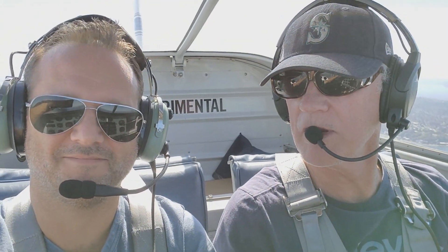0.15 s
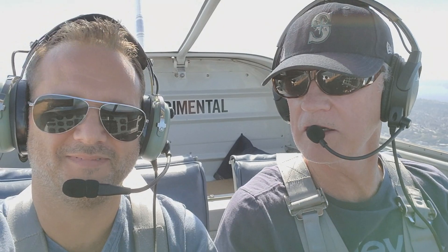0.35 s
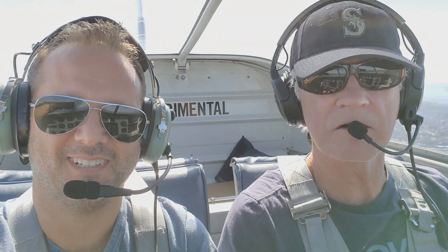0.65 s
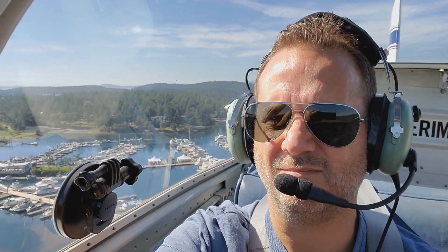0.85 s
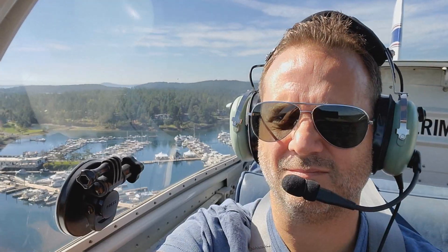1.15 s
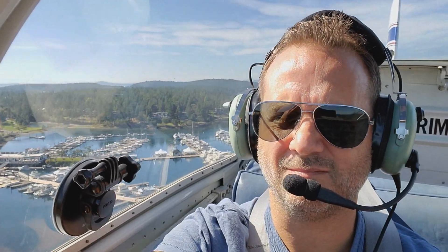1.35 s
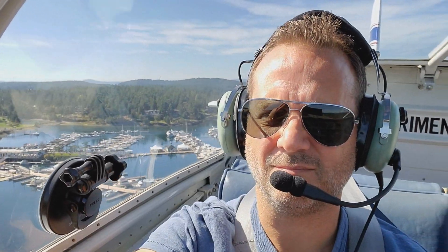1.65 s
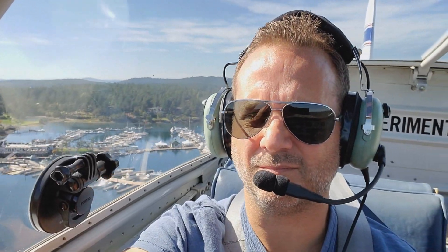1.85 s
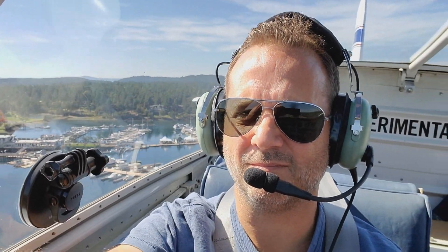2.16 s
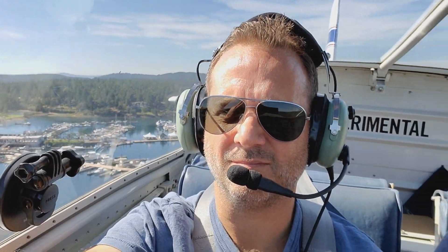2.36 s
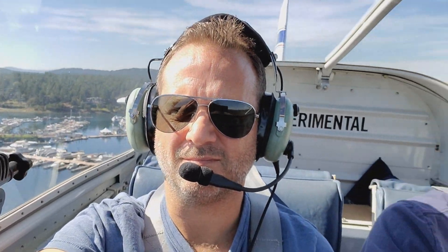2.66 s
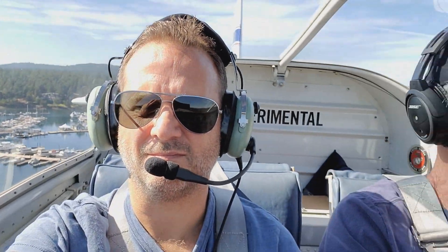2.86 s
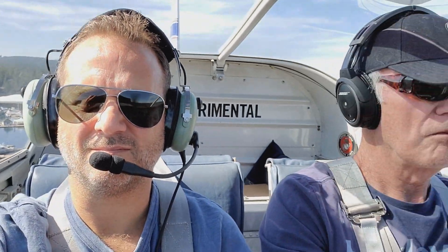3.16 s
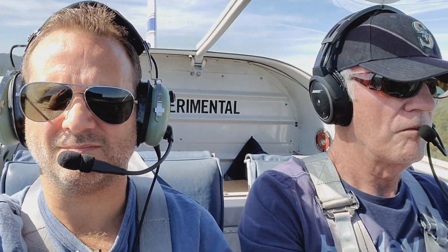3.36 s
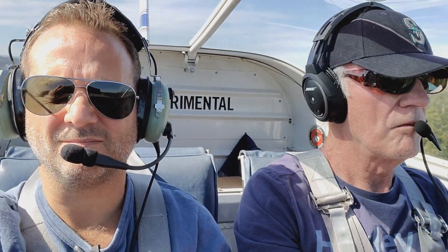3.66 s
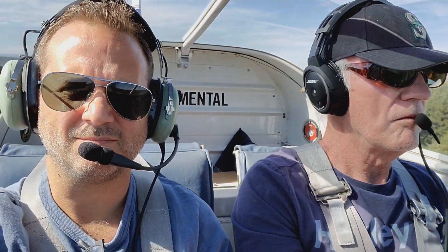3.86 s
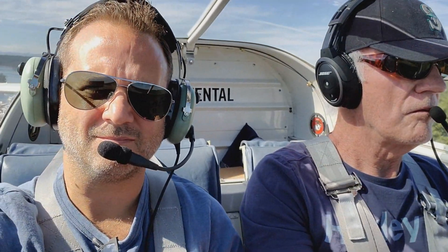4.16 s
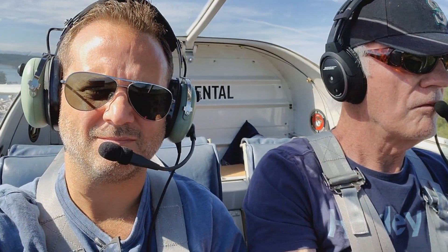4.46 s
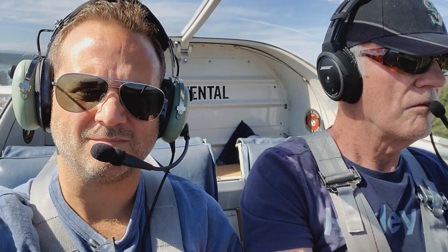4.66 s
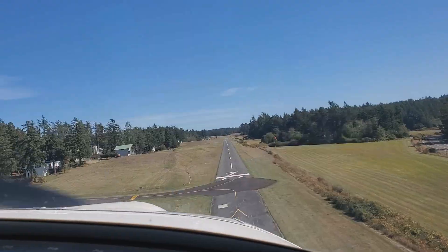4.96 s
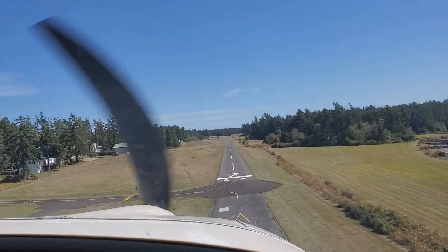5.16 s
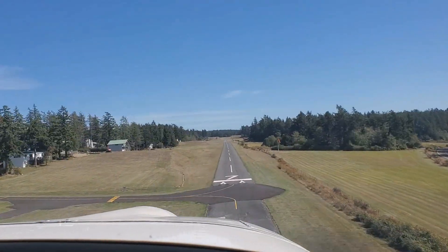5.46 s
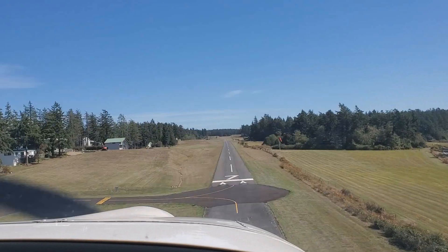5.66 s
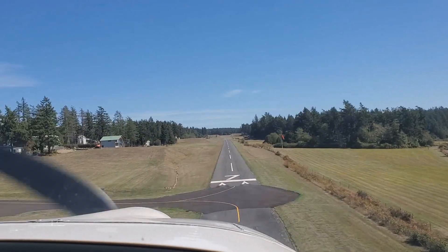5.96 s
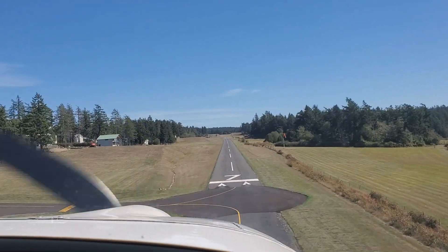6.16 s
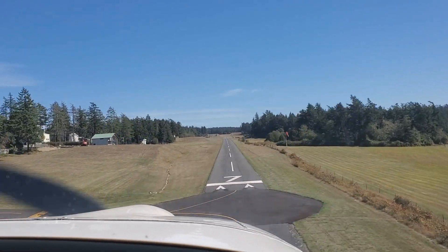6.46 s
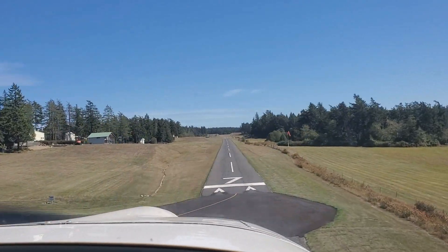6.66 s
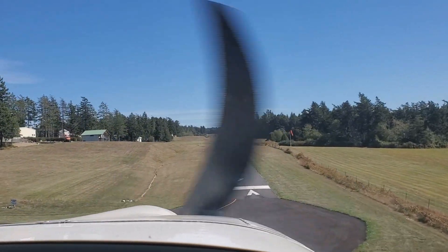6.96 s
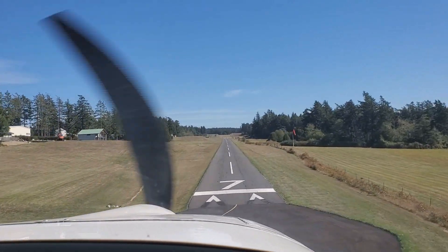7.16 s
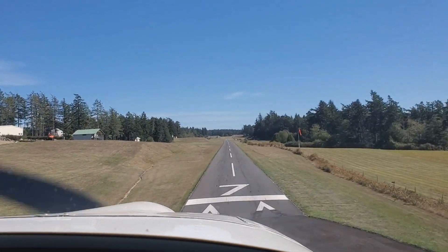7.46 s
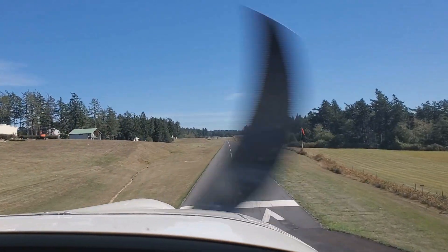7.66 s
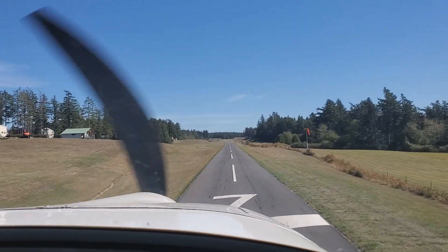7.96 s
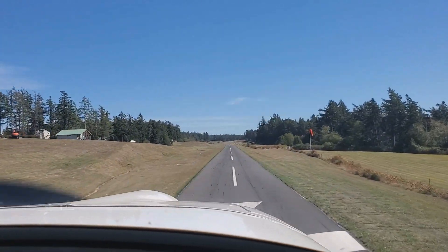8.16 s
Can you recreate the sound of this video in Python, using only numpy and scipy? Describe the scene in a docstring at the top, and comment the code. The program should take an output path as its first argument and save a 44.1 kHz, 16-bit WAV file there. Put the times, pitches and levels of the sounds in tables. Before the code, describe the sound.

A phone in a cramped light plane cabin picks up three abruptly joined stretches: fast cruise with a dense engine drone and strong wind; slower level flight with a deeper, smoother drone whose tone shifts gently as the phone swings; then an approach where the drone weakens, bassy buffets knock the airframe and a thin, rapid squeak chatters on top. No speech; wide, enclosed, boomy bass with dull-edged hiss.

```python
"""Inside the cabin of a light piston aircraft, a phone's two microphones hear three shots spliced together.
First fast cruise: the four-stroke engine drones and clatters on multiples of its cycle, over slipstream noise.
Then slower level flight, where the phone swings to mid-cabin and the drone's balance shifts with it.
Last the approach: a part squeaks once per crank turn, gusts thump the airframe and the drone falls back.
The phone's limiter ducks after the hardest thumps."""
import sys
import numpy as np
from scipy import signal
from scipy.fft import irfft
from scipy.io import wavfile
from scipy.ndimage import uniform_filter1d, minimum_filter1d

SR = 44100
rng = np.random.default_rng(int(sys.argv[2]) if len(sys.argv) > 2 else 0)


def dump(signal):
    """Clip the signal to [-1, 1] and save it as 16-bit WAV at the path in sys.argv[1]."""
    limited = np.clip(np.atleast_2d(signal).T, -1, 1)
    pcm = np.round(limited * 32767).astype(np.int16)
    wavfile.write(sys.argv[1], SR, pcm)


N = 366030
TIME = np.arange(N) / SR  # seconds
FREQ = np.maximum(np.fft.rfftfreq(N, 1 / SR), 1)  # Hz


def undb(db):
    """Decibels to gain."""
    return 10 ** (np.asarray(db) / 20)


def curve(rows):
    """Rows of time in seconds and value, joined by straight lines."""
    return np.interp(TIME, *np.transpose(rows))


def swing(rows):
    """A dB curve less the mean of its rows, so only its rises and falls count."""
    return curve(rows) - np.mean(np.array(rows)[:, 1])


def walk(rate):
    """Slow chance with a spread near 1: random points, rate per second, joined by straight lines."""
    knots = rng.standard_normal(1024)
    return np.interp(TIME * rate, np.arange(len(knots)), knots) * np.sqrt(3 / 2)


# Peaks and dips that the cabin and the microphone ports put on every broad spectrum.
# Each row: centre in Hz, width in Hz, left change in dB, right change in dB.
CABIN_PEAKS = [(203, 8.5, -3.5, 0), (230, 100, 3, 1), (397, 49, 0, -3.5), (442, 54, -12.5, 4.5),
               (558, 69, 2, -2), (625, 48, -3.5, 4.5), (1118, 130, 2, 4.5), (1299, 52, 7.5, 4.5),
               (1673, 55, 5.5, 1.5), (1820, 105, -3, 4), (2100, 250, 1.5, -1.5), (2320, 170, 2, 2),
               (3080, 2400, -2, 0), (4130, 550, 2.5, 1), (6600, 810, -5.5, 1), (7250, 1000, -3, 0.5),
               (8250, 1200, 0, -1), (11500, 1700, 0, 3), (13600, 2200, -1, 0.5)]


def colour(air, hz):
    """Relative left and right dB per Hz: a broad spectrum with the cabin's peaks and dips on it."""
    points, *sides = np.transpose(air)
    db = np.array([np.interp(np.log(hz), np.log(points), side) for side in sides])
    for centre, width, left, right in CABIN_PEAKS:
        bump = np.exp(-2 * ((hz - centre) / width) ** 2)
        db = db + np.outer([left, right], bump)
    return db


def likeness(hz, span_s=0.00048):
    """In the diffuse cabin both microphones hear the same bass but unrelated treble."""
    return np.sinc(2 * hz * span_s)


def stereo_spectrum(hz):
    """Random complex amplitudes of unit power for left and right, as alike as the cabin makes them."""
    mid, side = (rng.standard_normal((2, len(hz))) + 1j * rng.standard_normal((2, len(hz)))) / 2
    mid = mid * np.sqrt(1 + likeness(hz))
    side = side * np.sqrt(1 - likeness(hz))
    return np.array([mid + side, mid - side])


def cycles(rpm):
    """Count of four-stroke cycles: one for every two turns of the crank."""
    return np.cumsum(curve(rpm)) / (2 * 60 * SR)


def repeat(orders, amplitudes, cycle, size=8192):
    """Stereo lines of the given rms amplitudes, locked to the engine cycle."""
    spectrum = np.zeros((2, size // 2 + 1), complex)
    spectrum[:, orders] = amplitudes * size / np.sqrt(2)
    points = np.arange(size) / size
    return np.array([np.interp(cycle % 1, points, wave) for wave in irfft(spectrum)])


def drone(lines, air, cycle, cycle_hz, waver_db, smear, change, count=4):
    """Firing tone and the weaker lines of unequal cylinders; the firing multiples are the steadiest."""
    orders, *levels = np.transpose(lines)
    orders = np.round(orders).astype(int)
    hz = orders * cycle_hz
    # the cabin sets each line's left-right balance, not its power
    balance = undb(colour(air, hz))
    balance = balance / np.sqrt(np.mean(balance ** 2, axis=0))
    lead = np.arccos(likeness(hz)) * rng.choice([-1, 1], len(hz)) / 2
    # the lines arrive within a share (smear) of the cycle, so the drone throbs once per cycle
    delays = smear * rng.random(len(hz))
    phase = -2 * np.pi * np.cumsum(delays * np.diff(orders, prepend=0))
    tones = balance * np.exp(1j * (phase + np.array([lead, -lead])))
    out = 0
    for k in (1, 2, count):  # once-a-cycle, crank and firing multiples waver separately
        family = np.gcd(orders, count) == k
        before, after = (repeat(orders[family], (tones * undb(db))[:, family], cycle)
                         for db in (levels[0], levels[-1]))
        waver = waver_db * walk(11) * (.4 if k == count else 1)
        out = out + (before + change * (after - before)) * undb(waver)
    return out


def clatter(air, cycle, cycle_hz, onset_hz=700, fade_hz=2200, count=260):
    """Valve gear and exhaust rattle alike every cycle: a fine comb of lines in the middle range."""
    orders = np.arange(1, count)
    hz = orders * cycle_hz
    band = np.clip(2 * hz / onset_hz - 1, 0, 1) / (1 + (hz / fade_hz) ** 2)
    lines = stereo_spectrum(hz) * undb(colour(air, hz)) * band * np.sqrt(cycle_hz)
    return repeat(orders, lines, cycle)


def canopy(sound, share=0.24, lag_s=0.000324, sway=0.13):
    """A reflection off the canopy; its path changes as the phone moves, so the hiss changes colour."""
    lags = (lag_s * np.exp(sway * walk(0.793)) for _ in sound)
    echo = np.array([np.interp(TIME - lag, TIME, side) for lag, side in zip(lags, sound)])
    return (sound + share * echo) / np.hypot(1, share)


# Patches of rough air that swell the airframe rumble.
# Each row: middle in seconds, half length in seconds, rise in dB.
ROUGH_AIR = [(0.15, 0.3, 2.5), (2.55, 0.22, 3), (3.317, 0.077, 5), (3.95, 0.19, 2.5), (6.348, 0.43, 2),
             (8.0, 0.15, 3)]
RUMBLE_WANDER_DB, RUMBLE_WANDER_PER_S = 1.0, 4


def turbulence():
    """Rise of the rumble in dB: it wanders a little and swells in each patch of rough air."""
    swells = sum(db * np.exp(-((TIME - s) / length) ** 2) for s, length, db in ROUGH_AIR)
    return swells + RUMBLE_WANDER_DB * walk(RUMBLE_WANDER_PER_S)


def slipstream(air, cycle, rush, rumble_db, throb, split_hz=330, throb_top_hz=1600, flicker_db=0.4):
    """Airframe rumble, a roar that throbs with the engine, and smooth wind hiss on the canopy."""
    noise = stereo_spectrum(FREQ) * undb(colour(air, FREQ)) * np.sqrt(N * SR / 2)
    low, below_hiss = (1 / (1 + (FREQ / hz) ** 4) for hz in (split_hz, throb_top_hz))
    bands = (low, below_hiss - low, 1 - below_hiss)
    rumble, roar, hiss = (irfft(noise * band, N) for band in bands)
    # beats per engine cycle, each at its own chance phase
    beats = sum(np.cos(2 * np.pi * (k * cycle + rng.random())) for k in (1, 2, 3, 6, 7))
    wind = roar * (1 + throb * beats) + canopy(hiss)
    wind = wind * undb(swing(rush) + flicker_db * walk(14))
    return rumble * undb(rumble_db + turbulence()) + wind


def cabin(rpm, lines, air, rush, drone_db, waver_db, smear, clatter_db, air_db, rumble_db, throb, change=0):
    """Engine and air in one shot; change (0-1) moves the drone from its first balance to its second."""
    cycle = cycles(rpm)
    cycle_hz = np.mean(np.array(rpm)[:, 1]) / (2 * 60)
    cycle = cycle + 0.0017 * walk(9)  # the crank runs a little unevenly
    engine = undb(drone_db) * drone(lines, air, cycle, cycle_hz, waver_db, smear, change)
    engine = engine + undb(clatter_db) * clatter(air, cycle, cycle_hz)
    return engine + undb(air_db) * slipstream(air, cycle, rush, rumble_db, throb)


# Engine speed in fast cruise, nearly steady. Each row: time in seconds, speed in rpm.
CRUISE_RPM = [(0.0, 2535), (0.4, 2534), (0.8, 2529)]
# Drone lines in cruise; the fourth multiple is the firing rate.
# Each row: multiple of the four-stroke cycle rate, relative rms level in dB.
CRUISE_ORDERS = [(3, -42), (4, -16.5), (5, -35), (6, -39), (7, -32), (8, -21), (9, -38), (10, -24.5),
                 (11, -40), (12, -21.5), (13, -23.5), (14, -34.5), (15, -45), (16, -28), (17, -36.5),
                 (19, -49), (20, -37), (21, -40), (23, -35.5), (24, -40), (25, -36.5), (27, -46), (28, -43),
                 (29, -55)]
# Slipstream and engine noise at the two microphones in cruise.
# Each row: frequency in Hz, relative left level in dB per Hz, relative right level in dB per Hz.
CRUISE_AIR = [(30, -63, -59), (70, -48.5, -44), (112, -34.5, -40), (162, -51.5, -48.5), (290, -45, -42),
              (392, -57, -50.5), (654, -53.5, -52), (1100, -66, -61.5), (1470, -62, -54),
              (2250, -65.5, -63.5), (3660, -63.5, -61.5), (5040, -71.5, -66.5), (10000, -76, -74.5),
              (15500, -81, -76)]
# The slipstream eases at the end of the cruise. Each row: time in seconds, relative strength in dB.
CRUISE_RUSH = [(0.5, -23.5), (0.8, -25)]


def cruise():
    """Fast cruise: a fast-turning engine in strong slipstream."""
    return cabin(CRUISE_RPM, CRUISE_ORDERS, CRUISE_AIR, CRUISE_RUSH,
                 drone_db=0.54, waver_db=0.7, smear=0.351, clatter_db=-3,
                 air_db=-1.4, rumble_db=1.8, throb=0.059)


# Engine speed in level flight, sagging slowly. Each row: time in seconds, speed in rpm.
LEVEL_RPM = [(0.82, 2176), (2.1, 2182), (3.3, 2157), (3.8, 2150), (4.93, 2134)]
# Drone lines in level flight. Each row: multiple of the cycle rate (rounded to a whole number),
# relative rms level in dB before the phone swings, relative rms level in dB after.
LEVEL_ORDERS = [(3, -40.5, -39), (4, -13.5, -13.5), (5, -26, -26.5), (6, -36.5, -37), (7, -28, -27),
                (8, -28.5, -29), (9, -26.5, -27.5), (10, -35.5, -45), (11, -30.5, -34.5),
                (12, -27.5, -27.5), (14, -46, -38), (15, -27, -24.5), (16, -26, -23.5), (17, -42.5, -37),
                (18, -41, -37.5), (19, -35, -34.5), (20, -40, -39), (22, -48, -53), (23, -37, -35.5),
                (24, -31, -34.5), (25, -57, -62), (28, -38.5, -43), (34, -39, -38.5), (35, -38, -43),
                (36, -41, -47), (37, -46.5, -36), (38, -42.5, -46.5), (61, -43.5, -44), (72.5, -58, -68)]
# Slipstream and engine noise in level flight.
# Each row: frequency in Hz, relative left level in dB per Hz, relative right level in dB per Hz.
LEVEL_AIR = [(25, -61, -64), (45, -55, -46), (65.8, -48.5, -49), (114, -43, -38), (164, -48.5, -44.5),
             (312, -54, -51), (382, -56.5, -51), (557, -59, -55), (920, -67.5, -62.5), (1660, -71, -61.5),
             (3300, -71, -66), (4660, -77, -72.5), (10000, -81.5, -80.5), (15500, -88, -85.5)]
# The slipstream eases as the phone swings in. Each row: time in seconds, relative strength in dB.
LEVEL_RUSH = [(2.4, -26), (2.9, -27.3), (4.9, -26.5)]
# The phone swings to mid-cabin. Each row: time in seconds, share of the way from 0 to 1.
PHONE_SWING = [(2.7, 0), (3.8, 1)]


def level_flight():
    """Slower level flight: the engine turns more slowly and the phone's swing rebalances its lines."""
    return cabin(LEVEL_RPM, LEVEL_ORDERS, LEVEL_AIR, LEVEL_RUSH,
                 drone_db=-0.5, waver_db=0.4, smear=.7, clatter_db=-1.2,
                 air_db=-1.24, rumble_db=0.9, throb=0.14, change=curve(PHONE_SWING))


# Engine speed on approach, winding down. Each row: time in seconds, speed in rpm.
APPROACH_RPM = [(4.95, 2522.0), (5.4, 2504.0), (5.85, 2438.0), (6.9, 2360.0), (7.6, 2307.0), (8.3, 2280.0)]
# Drone lines on approach. Each row: multiple of the cycle rate, relative rms level in dB
# before the throttle closes, relative rms level in dB after.
APPROACH_ORDERS = [(2, -27, -37), (4, -20.5, -26), (6, -26.5, -39), (8, -35, -36.5), (10, -43, -36),
                   (11, -40, -41)]
# Slipstream and engine noise on approach.
# Each row: frequency in Hz, relative left level in dB per Hz, relative right level in dB per Hz.
APPROACH_AIR = [(25, -67, -61), (45.3, -43, -36), (70, -32, -30), (108.4, -36, -38), (151, -46.5, -44.5),
                (314, -50.5, -44.5), (380, -59.5, -51), (634, -63, -57), (950, -66.5, -61),
                (1700, -71.5, -62.5), (3130, -73, -67), (4870, -78.5, -74), (9700, -82, -81.5),
                (15500, -90.5, -87.5)]
# The slipstream builds near the ground. Each row: time in seconds, relative strength in dB.
APPROACH_RUSH = [(5.0, -32.7), (6.1, -31.5), (7.75, -32.7), (8.3, -28.5)]
# The throttle closes and the drone weakens. Each row: time in seconds, share of the way from 0 to 1.
THROTTLE_CLOSING = [(6.7, 0), (7.1, 1)]


def approach():
    """Final approach: the engine winds down and its drone falls back, with squeak and gusts over it."""
    flight = cabin(APPROACH_RPM, APPROACH_ORDERS, APPROACH_AIR, APPROACH_RUSH,
                   drone_db=0.0, waver_db=1.5, smear=0.99, clatter_db=-5.5,
                   air_db=0.84, rumble_db=-4.6, throb=0.11, change=curve(THROTTLE_CLOSING))
    return flight + buffets() + squeak()


# Bouts in which the squeaking part rubs.
# Each row: start in seconds, end in seconds, firmness of the contact in dB.
SQUEAK_BOUTS = [(4.93, 5.255, 0), (5.465, 5.52, 2), (5.64, 6.03, -1.5), (6.08, 6.35, -3.5), (6.35, 8.07, 0),
                (8.17, 8.4, 0.5)]
GRAZE_DB = -12  # firmness between bouts, when the part barely touches
# loudest at SQUEAK_RPM; the dB lost grow as the square of the distance, DETUNED_DB at 100 rpm away
SQUEAK_DB, SQUEAK_RPM, DETUNED_DB = -34, 2364, -4


def squeak_level():
    """Gain of the squeak: it comes in bouts and grows as the engine nears the speed that excites the part."""
    bouts = [np.where((TIME >= start) & (TIME < end), db, GRAZE_DB) for start, end, db in SQUEAK_BOUTS]
    contact_db = np.max(bouts, axis=0)
    detuned = ((curve(APPROACH_RPM) - SQUEAK_RPM) / 100) ** 2
    return undb(SQUEAK_DB + DETUNED_DB * detuned + contact_db)


# Pitch of the main squeak before each chirp bends it. Each row: time in seconds, pitch in Hz.
SQUEAK_PITCH = [(4.95, 8020), (5.6, 8380), (7.6, 8370), (7.75, 8150), (8.3, 8090)]
RUB_AT_TURN = 0.293  # share of a crank turn at which the part rubs


def squeak(rise_s=0.0019, fall_s=0.0027, glide_hz=120, scatter_hz=30, scatter_db=1.55,
           upper_hz=8990, upper_db=-7, upper_lag_s=0.0023, rasp_hz=8500, rasp_width_hz=950, rasp_db=-9,
           tail_s=0.013, tail_db=-6.5, ring_db=-11, left_db=2.5, right_db=-5.0):
    """A dry part chirps once per crank turn: two rising tones and a rasp, all dying in a short tail."""
    turns = 2 * cycles(APPROACH_RPM) - RUB_AT_TURN + .5
    turn = turns.astype(int)
    period = 1 / (np.gradient(turns) * SR)
    detune, size = rng.standard_normal((turn[-1] + 1, 2))[turn].T  # each chirp differs a little
    age = (turns % 1 - .5) * period  # seconds from the chirp's peak
    stroke = np.exp(-(age / np.where(age < 0, rise_s, fall_s)) ** 2) * undb(scatter_db * size)
    stroke = stroke / np.sqrt(np.mean(stroke ** 2)) * squeak_level()
    hold = np.exp(-1 / (tail_s * SR))
    tail = np.sqrt(signal.lfilter([1 - hold], [1, -hold], stroke ** 2))
    ring = np.hypot(stroke, undb(ring_db) * tail)
    bend = glide_hz * np.clip(age / fall_s, -2, .5) + scatter_hz * detune
    main, upper = (np.sqrt(2) * np.exp(2j * np.pi * np.cumsum(hz + bend) / SR)
                   for hz in (curve(SQUEAK_PITCH), upper_hz))
    main = main * ring
    upper = upper * undb(upper_db) * np.interp(TIME - upper_lag_s, TIME, ring)
    # the tones reach the right microphone about a third of a wave later
    left = undb(left_db) * main + .5 * upper
    right = (undb(right_db) * main + upper) * np.exp(-2j)
    tones = np.real([left, right])
    rasp_band = 1 / (1 + ((FREQ - rasp_hz) / rasp_width_hz) ** 2) ** 1.5
    rasp = irfft(stereo_spectrum(FREQ) * rasp_band, N)
    return tones + rasp / rasp.std() * np.hypot(undb(rasp_db) * stroke, undb(tail_db) * tail)


# Gusts that thump the airframe. Each row: time of the peak in seconds, relative level in dB.
BUFFETS = [(5.018, -6), (5.189, -11), (5.495, -2), (5.893, -7), (6.26, -8.5), (6.482, -10.5), (6.687, -2.5),
           (6.764, -9), (7.712, -11), (7.928, -5.5), (8.239, -11.5)]


def buffets(boom_hz=80, length_s=0.018, gain_db=1, shake_db=-15, shake_hz=340):
    """Each gust pushes the cabin's lowest air resonance for a few cycles and shakes the panels."""
    panels = signal.butter(2, [shake_hz / 4, shake_hz], "band", fs=SR, output="sos")
    shake = signal.sosfilt(panels, rng.standard_normal(N))
    shake = shake / shake.std() * undb(shake_db)
    out = np.zeros(N)
    chances = 2 * rng.random((len(BUFFETS), 2)) - 1
    for (s, db), (detune, phase) in zip(BUFFETS, chances):
        t = TIME - s
        boom = np.sin(2 * np.pi * boom_hz * (1 + 0.13 * detune) * t + np.pi * phase)
        out += undb(db + gain_db) * np.exp(-(t / length_s) ** 2) * (boom + shake)
    return out


def splice(before, after, at_s):
    """An edit with an equal-power crossfade of 8 milliseconds."""
    turn = np.clip((TIME - at_s) / .008 + .5, 0, 1) * np.pi / 2
    return before * np.cos(turn) + after * np.sin(turn)


# The two edits: cruise to level flight in seconds, level flight to approach in seconds.
CUTS_S = (.812, 4.93)


def scene():
    """The three shots joined by abrupt cuts."""
    first, second, third = cruise(), level_flight(), approach()
    return splice(splice(first, second, CUTS_S[0]), third, CUTS_S[1])


CEILING_DB, RELEASE_DB_PER_S = -0.24, 16


def limiter(sound, size=131):
    """Peaks over the ceiling pull the gain down within milliseconds; it recovers at a steady rate."""
    peak_db = 20 * np.log10(np.abs(sound).max(axis=0) + 1e-9)
    over_db = np.maximum(peak_db - CEILING_DB, 0)
    recovery = RELEASE_DB_PER_S * TIME
    cut_db = np.maximum.accumulate(over_db + recovery) - recovery
    # hold and smooth over size samples, so the gain starts down just ahead of the peak
    return sound * undb(uniform_filter1d(minimum_filter1d(-cut_db, size), size))


TOP_HZ = 16050


def record(dry):
    """The phone drops the deepest rumble, ducks after the hardest thumps and cuts the top."""
    dry = signal.sosfilt(signal.butter(2, 22, "high", fs=SR, output="sos"), dry)
    top_cut = signal.ellip(10, .2, 80, TOP_HZ, fs=SR, output="sos")
    return signal.sosfilt(top_cut, limiter(dry))


dry = scene()
out = record(dry)
dump(out)
```